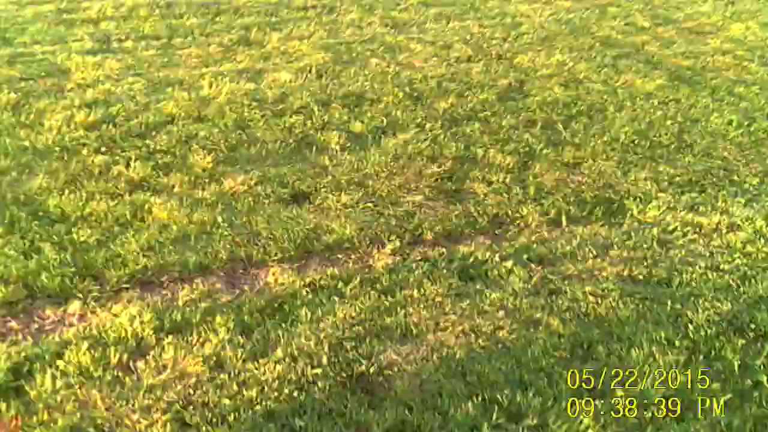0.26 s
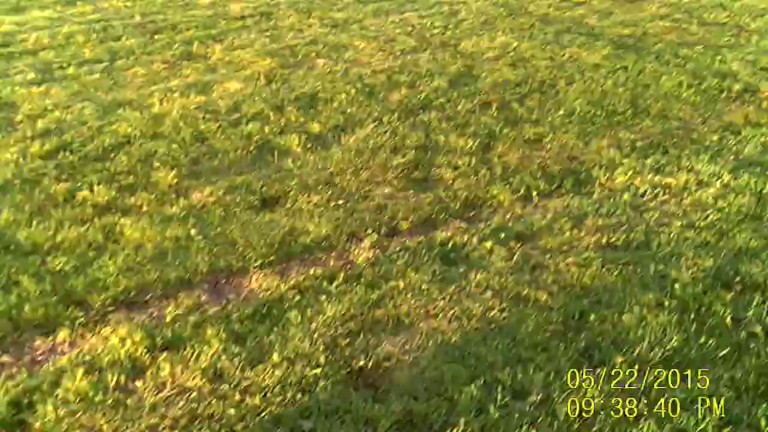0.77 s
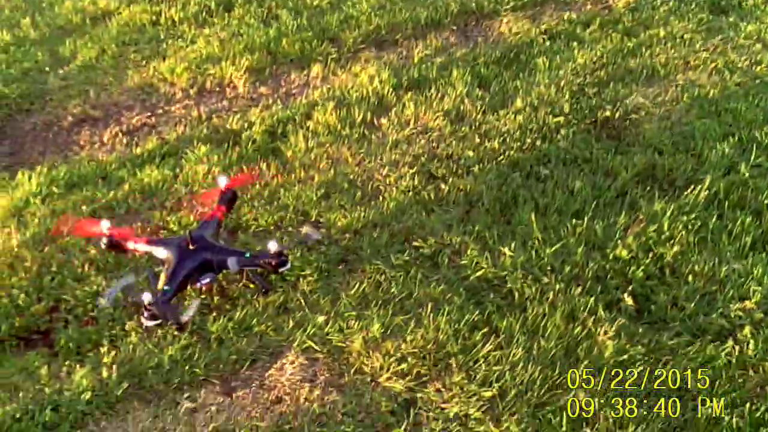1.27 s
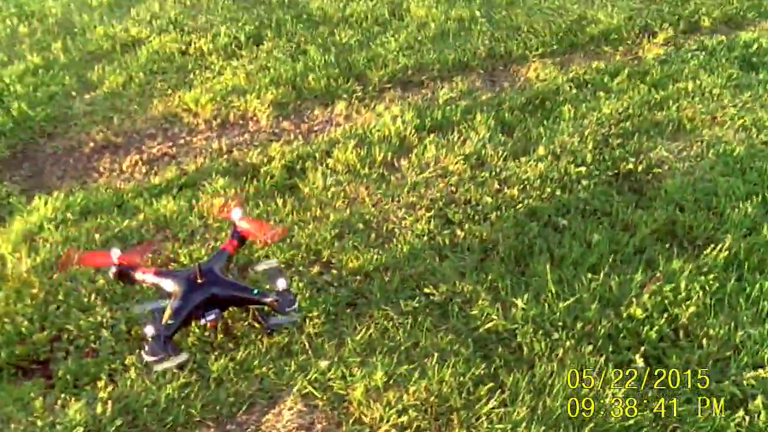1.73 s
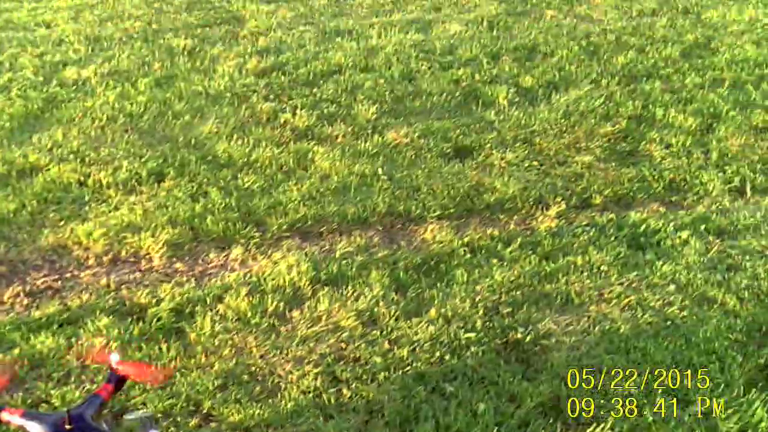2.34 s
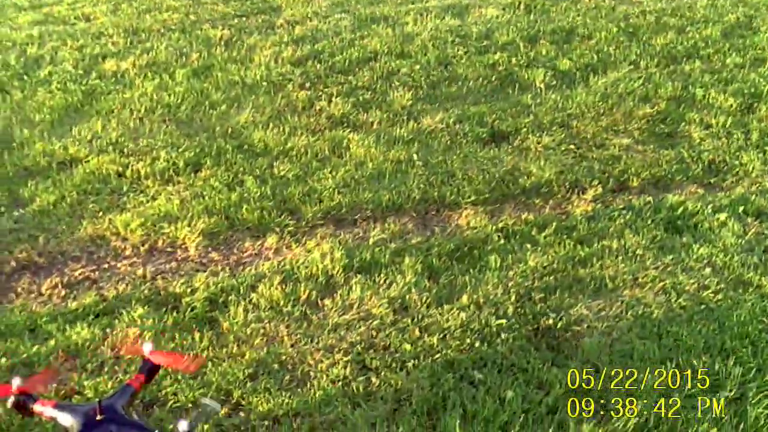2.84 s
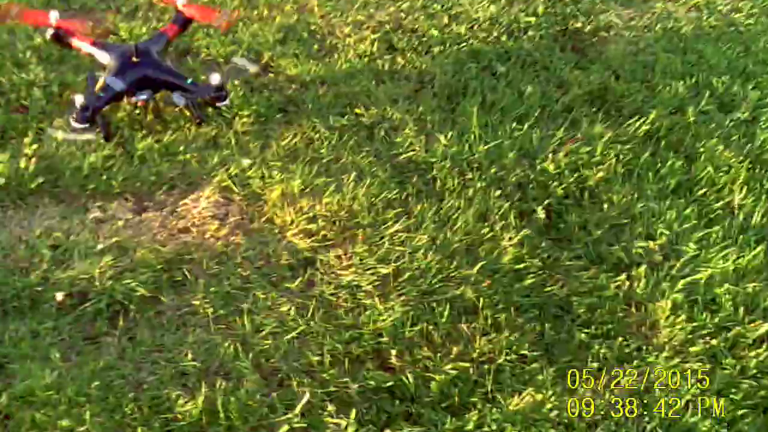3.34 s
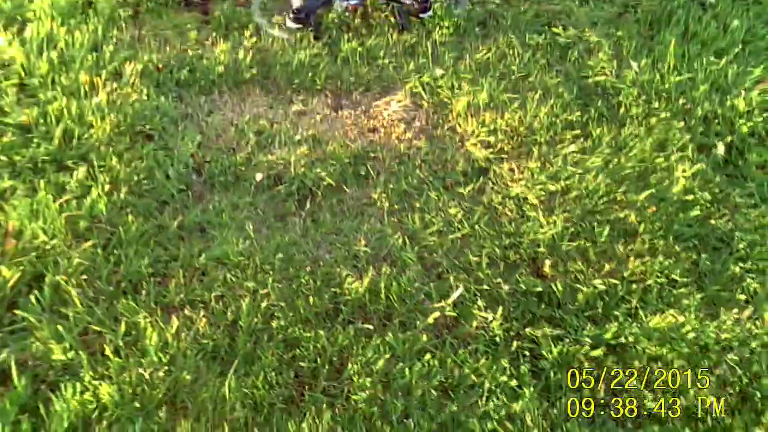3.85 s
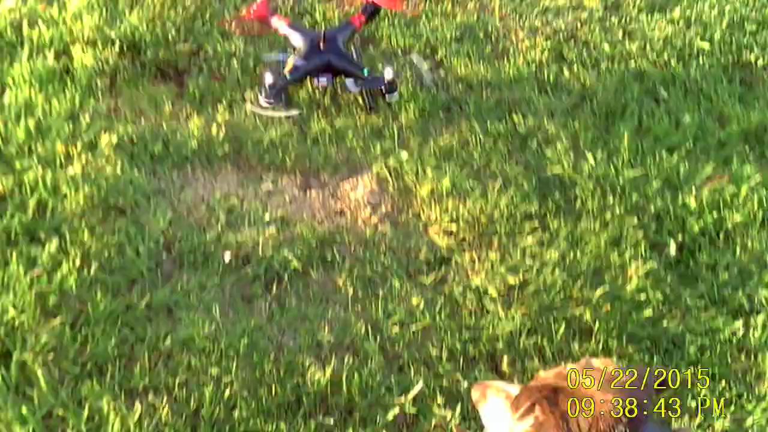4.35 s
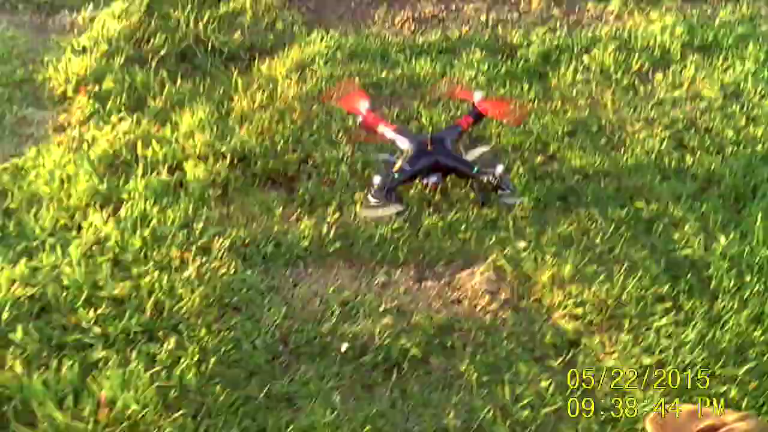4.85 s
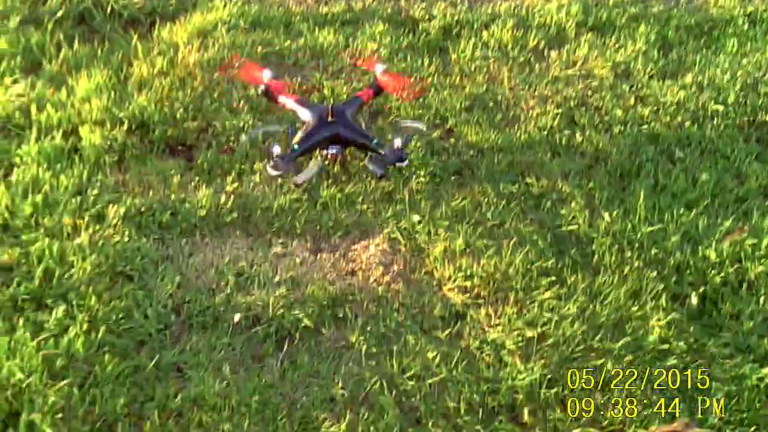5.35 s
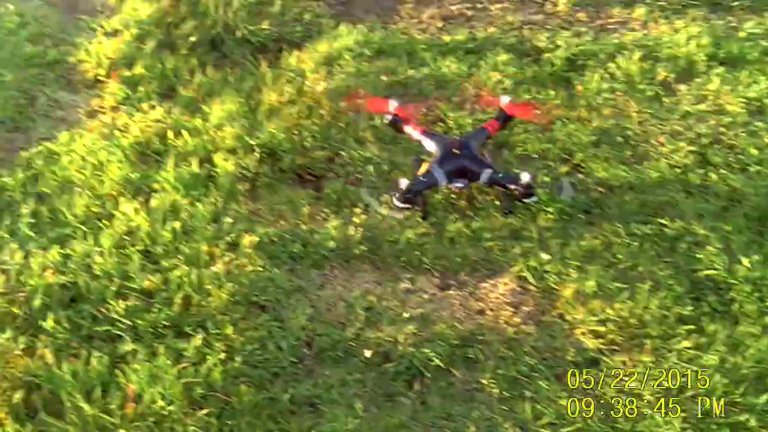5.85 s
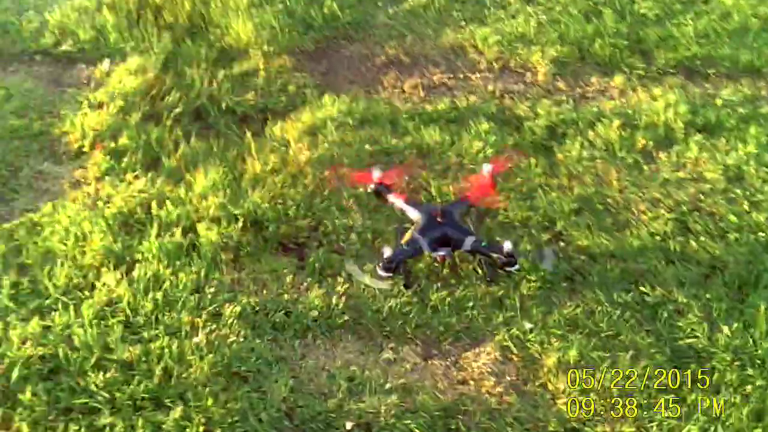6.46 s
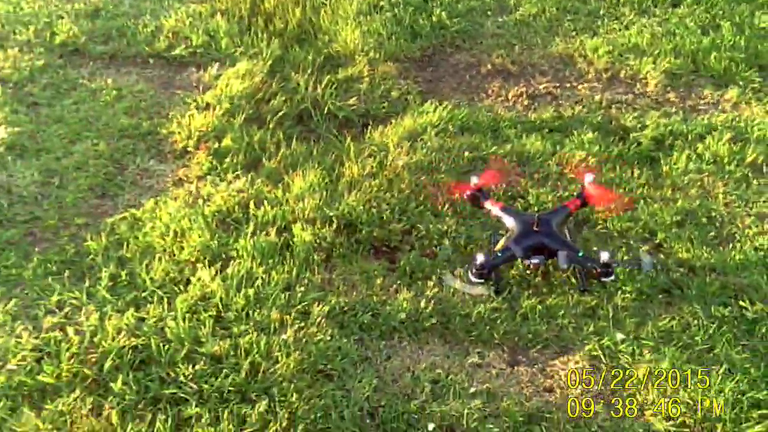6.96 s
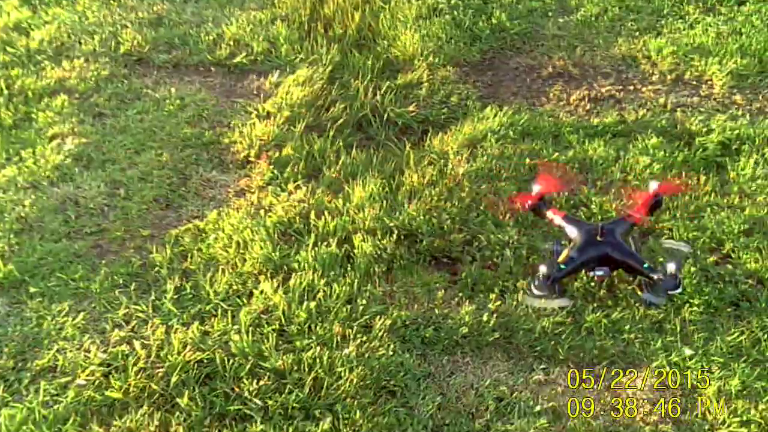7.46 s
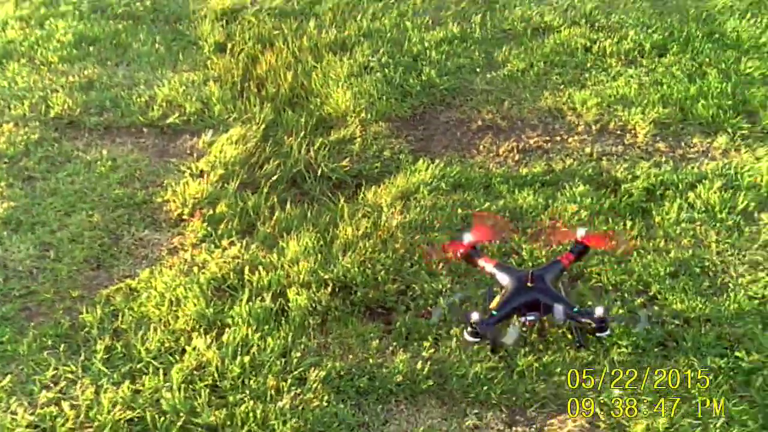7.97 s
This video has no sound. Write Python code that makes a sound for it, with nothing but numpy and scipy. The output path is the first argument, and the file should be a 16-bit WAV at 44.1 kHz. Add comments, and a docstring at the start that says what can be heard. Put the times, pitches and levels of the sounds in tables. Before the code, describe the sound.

Fingers shift on a thin plastic shell right against the microphone. Dry midrange clicks and short skin rubs come in loose groups over low hand rumble and quiet hiss. After a lull, hard knocks crackle and overload, then busy scraping with brief squeaks, another loud snap, scattered ticks and a closing scrape. Dry outdoor close-up, dull highs, no echo.

```python
"""Ticks and snaps of a plastic case come first, over a creeping grip and the low sway of the hand.
A small hand-held camera is held outdoors: jolts and tiny skin slips excite the decaying modes of its case.
Fingers scrape and squeak along it as bunched jerks and gliding tones; low thumps are bell-shaped pulses.
Shaped noise makes the thin hiss under it all, and the loudest snaps overload the recorder."""
import sys
import numpy as np
from scipy import signal
from scipy.fft import rfft, irfft
from scipy.io import wavfile
from scipy.ndimage import uniform_filter1d

SR = 44100
rng = np.random.default_rng(int(sys.argv[2]) if len(sys.argv) > 2 else 0)


def unload_audio(sound):
    """Save the sound as a 16-bit wav file, at the path given as the first command line argument."""
    columns = np.transpose(np.atleast_2d(sound))
    # keep every value between -1 and 1, then stretch to whole-number steps
    steps = np.round(np.clip(columns, -1, 1) * 32767)
    wavfile.write(sys.argv[1], SR, steps.astype(np.int16))


N = 361617
T = np.arange(N) / SR

# Colour of the hiss, before its overall level is set: (frequency [Hz], relative density [dB])
HISS_COLOUR = [(35, -38), (60, -2.5), (537, -15), (947, -14), (2220, -20.5), (2680, -17), (3490, -23),
               (5000, -21.5), (5490, -29.5), (7140, -54), (12100, -120)]
# The resting hand, glided between points: (time [s], creep of the grip in the shell [dB RMS], sway [dB RMS])
GRIP_LEVELS = [(0.0, -41, -27), (0.27, -71.5, -53), (0.62, -74, -49), (0.84, -45.5, -44), (1.3, -62.5, -53),
               (1.6, -43.5, -51), (1.74, -57.5, -50.5), (2.24, -58.5, -49), (2.56, -65.5, -52),
               (3.08, -53, -42.5), (3.299, -57.5, -44.5), (4.159, -71.5, -50.5), (4.27, -52, -46),
               (4.59, -52.5, -34), (4.82, -57.5, -39), (5.75, -54.5, -41), (6.37, -50, -37),
               (6.48, -63, -49), (6.9, -57.5, -41.5), (7.35, -54, -52.5), (7.86, -68, -43.5),
               (8.2, -46, -34)]
# Resonances of the case: (frequency [Hz], level against the others of its part [dB], free t60 [s])
CASE_MODES = [(182, -2, 0.033), (404, -6.5, 0.026), (473, 5.5, 0.0089), (700, -46, 0.054), (940, 7, 0.051),
              (1090, 19.5, 0.015), (1415, 11, 0.026), (1530, 3.5, .02), (2185, 12, 0.019),
              (2650, 13, 0.021), (2781, 15, 0.017), (3000, -17.5, 0.011), (4203, 2, 0.0096),
              (4434, -1.5, 0.013), (4800, -19.5, 0.042)]
# Upper edges of body, shell and lid; the microphone port rings above the last: (body, shell, lid [Hz])
PART_TOPS_HZ = (700, 1800, 3500)
# Low thumps, from short thuds under the hard knocks to slower pushes of the palm:
# (centre time [s], level before a fixed trim [dB], width setting [ms], direction [+1 or -1])
LOW_THUMPS = [(0.685, -28, 1.2, 1), (0.699, -34, 3.8, 1), (0.755, -18, 0.63, 1), (3.081, -27, 4, 1),
              (3.672, -12, 0.53, 1), (4.277, -29.5, 1.6, -1), (4.589, -13.5, 2.6, -1), (4.601, -27, 5.4, 1),
              (4.638, -29, 1.5, -1), (5.159, -8, 0.45, 1), (5.176, -33, 3.1, -1), (5.189, -28, 4.2, 1),
              (5.206, -26, 7.3, -1), (5.797, -23.5, 0.92, 1), (6.043, -32, 3.5, -1), (6.127, -25, 11, -1),
              (6.193, -20, 1.1, -1), (6.297, -30, 2.2, -1), (6.314, -32, 2.4, -1), (6.366, -18.5, 1.83, -1),
              (6.694, -30, 2.4, 1), (6.823, -30, 0.87, 1), (6.917, -29.5, 1.3, 1), (7.607, -33, 6, 1),
              (7.919, -29.5, 0.84, -1), (7.998, -14, 2.73, -1), (8.19, -27, 3.4, 1)]
# Skin scraping along the case, levels before each part's trim:
# (time [s], length [ms], shell [dB], body against shell [dB], port against shell [dB])
SKIN_SCRAPES = [(0.108, 26, -39.5, -32, -26), (0.586, 136, -43, 1, -27.5), (0.713, 42, -42.5, 1, -18),
                (0.761, 37, -41, 8.5, -22), (0.87, 94, -38, -5.5, -31), (0.908, 85, -36.5, -23, -27),
                (1.052, 38, -44, -4, -23), (1.23, 98, -46.5, -7, -26), (1.421, 50, -50, -2, -21),
                (1.541, 81, -39, -6, -23), (1.62, 133, -40, -12.5, -23), (1.94, 46, -43.5, -10, -28),
                (2.247, 31, -47.5, -3.5, -27), (2.327, 28, -46, -12, -20), (3.004, 104, -55, -3, -21),
                (3.2, 84, -58.5, -6, -23), (3.556, 56, -46, -7, -32), (4.228, 63, -49, -8, -47),
                (4.289, 120, -52, 0, -20), (4.513, 71, -48.5, 5.5, -24), (4.6, 40, -42, -15, -22),
                (4.766, 40, -39, -6, -33), (4.81, 106, -49, -12, -30), (5.176, 95, -50, 1, -39),
                (5.347, 170, -44, -11.5, -25), (5.676, 22, -48, -2.5, -12), (5.809, 28, -34.5, -4.5, -14.5),
                (5.838, 56, -39.5, -16, -24), (5.885, 15, -42, -1.5, -8.5), (5.903, 21, -38.5, -19, -27),
                (5.926, 52, -44, -9, -7.5), (5.991, 49.5, -35, -4.5, -27), (6.041, 37, -41.5, -4.5, -25),
                (6.131, 40, -36.5, 5.5, -26), (6.159, 49.5, -34, -4.5, -17), (6.209, 21, -41.5, 1, -18),
                (6.291, 68, -41, 2, -7.5), (6.369, 60, -38, -5, -10.5), (6.467, 83, -43.5, -17, -20),
                (6.677, 67, -47.5, 5, -23), (6.772, 16, -41, -21.5, -20), (6.789, 18, -41, 9.5, -23),
                (6.812, 23.6, -37.5, -5, -21), (6.918, 70, -51, -1, -18.5), (7.074, 40, -43.5, -0.5, -31),
                (7.574, 41, -45, 5, -21.5), (7.904, 51, -51.5, 8.5, -33), (7.988, 28, -42, -4, -3.5),
                (8.036, 83, -44.5, -14, -5.5), (8.115, 43, -29, -17, -9.5), (8.162, 20, -41, 3.5, -5.5)]
# A dry fingertip squeaking on the lid: (time [s], length [ms], start pitch [Hz], end pitch [Hz], level [dB RMS])
FINGER_SQUEAKS = [(5.885, 18.6, 2760, 2270, -37.5), (5.927, 67, 2710, 2500, -37),
                  (6.162, 44, 2420, 2650, -33.5)]
# Snaps and ticks: (time [s], shell peak [dB], favoured shell pitch [Hz], lid peak against shell [dB], slip [ms])
CASE_SNAPS = [(0.0281, -27.5, 940, 1.5, 0.33), (0.1092, -38, 910, -9, 1.4), (0.584, -21.5, 940, -35, 0.91),
              (0.6445, -32.5, 1100, -11.5, 1.8), (0.7421, -27, 1140, -8.5, 0.98),
              (0.7528, -20.5, 1090, -15, 0.65), (0.828, -27, 1120, -21, 0.75),
              (0.8635, -25.5, 1010, -21, 2), (0.89, -26.5, 930, -19, 1.64), (0.9164, -27.5, 875, -5, 0.5),
              (1.0592, -40, 980, -6, 1.75), (1.2326, -33.5, 970, -17, 1.8), (1.4324, -39, 960, 5, 0.6),
              (1.5432, -34, 1110, 0.5, 0.84), (1.596, -29.5, 1010, -5, 2.5), (1.603, -10, 963, -11.5, 2.07),
              (1.634, -30.5, 990, -2, 0.69), (1.703, -36, 940, -2.5, 5.2), (1.7212, -27.5, 990, -11, 1.4),
              (1.9607, -40, 1140, 0, 1.7), (2.0308, -34.5, 1090, -17, 1.2),
              (2.056, -30.5, 1060, -9.5, 0.89), (2.2678, -31, 890, -9.5, 2.64),
              (2.3433, -38, 1370, -0.5, 0.46), (2.3869, -30.5, 930, -7.5, 0.93),
              (2.424, -35.5, 1140, -11, 0.87), (2.8987, -30, 1010, -18, 3.7),
              (3.0144, -35.5, 1090, -9, 2.3), (3.0992, -36, 1090, -9, 0.24),
              (3.3444, -36.5, 1150, -13, 0.73), (3.5606, -34, 940, -15, 3.04),
              (3.671, -0.5, 956, -14.5, 0.74), (3.8395, -41, 1080, -21, 0.98), (3.8763, -36, 950, -14, 1.5),
              (4.2764, -12, 1160, -2, 0.16), (4.336, -23, 1165, -14, 0.62), (4.4689, -25, 960, -13, 1.15),
              (4.5074, -24, 960, -12.5, 2.1), (4.527, -36.5, 1000, 0.5, 0.8),
              (4.547, -17, 1090, -21.5, 0.45), (4.569, -13, 940, -4.5, 0.46),
              (4.5784, 15.5, 1110, -21, 1.07), (4.5879, -6.5, 1005, -6.5, 1.08),
              (4.6348, -21.5, 970, -14, 1.08), (4.6404, -20.5, 1020, -4, 1.2),
              (4.7701, -15.5, 1000, -18.5, 0.874), (5.0472, -17.5, 1040, -13.5, 1.1),
              (5.0852, -46, 970, 1, 0.5), (5.1574, -4, 876, -8, 0.93), (5.1588, -2, 1080, -19.5, 2.9),
              (5.1645, -9.5, 1035, -21.5, 1.06), (5.197, -13.5, 1065, -14, 2.4),
              (5.235, -21.5, 1050, -12.5, 0.85), (5.4697, -27.5, 1000, -20, 0.94),
              (5.613, -35, 980, -5.5, 0.77), (5.8587, -31, 1090, -16, 2.34), (5.9879, -20, 960, -12.5, 1.1),
              (6.0038, -26.5, 1040, -9, 0.85), (6.034, -28.5, 1030, -20, 1.74),
              (6.1655, -17, 885, -4.5, 0.47), (6.1885, -16, 974, -15, 1.1), (6.2957, -30, 950, -8, 0.88),
              (6.3172, -27, 1300, 0, 0.23), (6.339, -15.5, 980, -0.5, 0.67), (6.469, -27, 1000, 1.5, 0.86),
              (6.5125, -30, 1020, -13, 0.67), (6.6773, -35, 930, -23, 1.43),
              (6.7104, -1, 1104, -14.5, 1.58), (6.825, -27, 920, -9.5, 1.38),
              (6.9129, -23.5, 1055, -11.5, 1.42), (7.0338, -23.5, 1070, -13.5, 1.08),
              (7.2273, -15.5, 1090, -5, 1.16), (7.5766, -32, 940, -12.5, 3.2), (7.826, -29, 1045, -1, 0.39)]

BODY, SHELL, LID, PORT = range(4)
HISS_DB = -61.5  # RMS
SWAY_TOP_HZ = 14.1
# Creep: its lid against the shell; the palm's rumble lies between creep and sway
CREEP_LID_DB, PALM_DB, PALM_SWAY_SHARE = -10, -3, 0.37
# A scrape's lid brightens with the port, less steeply: dB against the shell, and dB per port dB
SCRAPE_LID_DB, LID_PER_PORT_DB = 3.5, 0.58
# A middling snap gives the body this much; harder ones stay more in the shell; the port follows the lid
SNAP_MID_DB, SNAP_BODY_DB, BODY_LOSS_PER_DB, SNAP_PORT_BELOW_LID_DB = -28, -13, 0.26, 11.5
# Share of the free ring left after a 1 ms slip; slower slips ring longer by this power
RING_SHARE, RING_POWER = 0.52, 0.43
PREAMP_CLIP, LATE_CLIP = 0.72, 0.69  # share of full scale
MIC_TOP_HZ, TOP_HZ, DC_OFFSET = 5550, 16100, 0.0044


def undb(db):
    """Turn decibels into an amplitude factor."""
    return 10 ** (np.asarray(db) / 20)


def level(x, db):
    """Set a sound's RMS level in dB."""
    return x * undb(db) / np.sqrt(np.mean(x ** 2))


def add(track, s, sound):
    """Mix a short sound in at time s."""
    i = int(s * SR)
    track[i:i + len(sound)] += sound[:N - i]


def lowpass(x, order, hz):
    """Dull a sound above hz with a smooth filter."""
    return signal.sosfilt(signal.butter(order, hz, fs=SR, output="sos"), x)


def walk(rate_hz):
    """Random levels held 1 / rate_hz seconds, then slewed into ramps; spread near 1."""
    k = int(SR / rate_hz)
    held = np.repeat(rng.standard_normal(N // k + 1), k)
    return 1.14 * uniform_filter1d(held, k)[:N]


def hiss():
    """Amplifier hiss and far outdoor noise, dulled by the case: white noise coloured in its spectrum."""
    hz, db = np.transpose(HISS_COLOUR)
    f = np.arange(N // 2 + 1) * SR / N + 1  # 1 Hz up, so the logarithm exists
    colour = undb(np.interp(np.log(f), np.log(hz), db))
    return level(irfft(rfft(rng.standard_normal(N)) * colour, N), HISS_DB)


def sway():
    """The hand's slow movement pumps the sealed air behind the microphone: very low noise."""
    s, _, sway_db = np.transpose(GRIP_LEVELS)
    slow = lowpass(rng.standard_normal(N), 2, SWAY_TOP_HZ)
    return level(slow, 0) * undb(np.interp(T, s, sway_db))


def case_modes(hold=1.0):
    """One decaying sine per mode, building up over a cycle or two; hold scales its ring time."""
    hz, db, t60 = np.transpose(CASE_MODES)[:, :, None]
    t = T[:int(0.05 * SR)]
    free = np.exp(-np.log(1000) * t / np.maximum(t60, 0.003))
    # the touched wall follows hold, the far side rings weakly at its free rate
    decay = free ** (1 / np.clip(hold, 0.15, 2)) + 0.089 * free
    build_up = 1 - np.exp(-(t * hz / 1.1) ** 2)
    rings = undb(db) * np.sin(2 * np.pi * hz * t) * decay * build_up
    return hz[:, 0], rings, np.searchsorted(PART_TOPS_HZ, hz[:, 0])


def favoured(hz, part, near_hz, reach_oct, least=0.069):
    """Shell modes near the touched spot's pitch ring most, the others keep a small share."""
    nearness = np.exp(-0.5 * (np.log2(hz / near_hz) / reach_oct) ** 2)
    return np.where(part == SHELL, least + nearness, 1)


def slips(per_s):
    """Tiny uneven jerks of skin that sticks and lets go: random impulses of either sign."""
    happens = rng.random(N) < per_s / SR
    size = np.minimum(rng.exponential(size=N), 2.5)
    return happens * rng.choice([-1, 1], N) * size


def palm(gain):
    """The palm's drag, felt as a dull rumble: low noise of wandering strength."""
    band = signal.butter(1, (35, 170), "bandpass", fs=SR, output="sos")
    drag = lowpass(signal.sosfilt(band, rng.standard_normal(N)), 2, 260)
    return gain * level(drag * undb(3.3 * walk(25)), -2.5)


def creep(near_hz=1000, reach_oct=0.35, catch_db=4.0, catch_hz=90, swell_db=5.0, swell_hz=14):
    """A light grip damps little: small slips ring shell and lid in short blobs that swell and fade."""
    s, shell_db, sway_db = np.transpose(GRIP_LEVELS)
    hz, rings, part = case_modes(hold=2)
    favour = favoured(hz, part, near_hz, reach_oct)
    jerks = slips(per_s=1200) * undb(catch_db * walk(catch_hz) + swell_db * walk(swell_hz))
    palm_db = PALM_DB + shell_db + PALM_SWAY_SHARE * (sway_db - shell_db)
    out = palm(undb(np.interp(T, s, palm_db)))
    for k, db in ((SHELL, shell_db), (LID, shell_db + CREEP_LID_DB)):
        ring = signal.oaconvolve(jerks, favour[part == k] @ rings[part == k])[:N]
        out += undb(np.interp(T, s, db)) * level(ring, 0)
    return out


def thumps(leak_hz=25):
    """Each thump pushes the diaphragm as a bell-shaped pulse; the vent leaks, so it swings back past rest."""
    out = np.zeros(N)
    for s, db, ms, way in LOW_THUMPS:
        width = ms / 1000
        t = T[:int(6 * ms * SR / 1000)] - 3 * width
        push = np.exp(-0.5 * (t / (0.6 * width)) ** 2)
        add(out, s + t[0], np.sign(way) * undb(db + 1.0) * push)
    return signal.sosfilt(signal.butter(2, leak_hz, "highpass", fs=SR, output="sos"), out)


def scrapes(edge_ms=10.0, catch_db=3.0, catch_hz=80):
    """Sliding skin jerks in dense bunches and rings every part of the case, over the palm's rumble."""
    gain = np.zeros((4, N))
    for s, ms, db, body_db, port_db in SKIN_SCRAPES:
        lid_db = SCRAPE_LID_DB + LID_PER_PORT_DB * port_db
        parts_db = db + np.array([[body_db], [0], [lid_db], [port_db]])
        gain[:, int(s * SR):int((s + ms / 1000) * SR)] += undb(parts_db)
    gain = uniform_filter1d(gain, int(edge_ms * SR / 1000), axis=1)
    _, rings, part = case_modes()
    jerks = slips(per_s=3000)
    bunches_db = catch_db * walk(catch_hz)  # shared by all parts
    out = palm(gain[BODY])
    for k, trim_db in enumerate((-6.0, -3.5, -4.5, 0.3)):
        ring = signal.oaconvolve(jerks, rings[part == k].sum(axis=0))[:N]
        out += gain[k] * level(ring * undb(bunches_db + 2.8 * walk(70)), trim_db)
    return out


def squeaks(width_hz=500):
    """Fast regular stick-slip: a gliding tone whose strength and phase stumble every few ms."""
    out = np.zeros(N)
    slow = signal.butter(2, width_hz / 2, fs=SR, output="sos")
    for s, ms, from_hz, to_hz, db in FINGER_SQUEAKS:
        n = int(ms * SR / 1000)
        stumble = signal.sosfiltfilt(slow, rng.standard_normal((2, 4096)))[:, :n]
        phase = 2 * np.pi * np.cumsum(np.linspace(from_hz, to_hz, n)) / SR
        tone = (stumble[0] + 1j * stumble[1]) * np.exp(1j * phase)
        add(out, s, level(tone.real * signal.windows.tukey(n, 0.4), db))
    return out


def snap_force(t, slip, rattle=0.51, rattle_ms=3.3):
    """The push of one snap: a rough slip swells and fades, a jolt strikes, loose edges rattle after it."""
    rough = rng.standard_normal(len(t))
    taps = rng.random(len(t)) < 600 / SR
    jolt = int(max(slip - 0.0007, 0) * SR)
    force = rough * (t / slip) * np.exp(1 - 2 * t / slip) / np.sqrt(slip * SR)
    force[jolt] += 1
    rattling = rough * taps * np.exp(-t * 1000 / rattle_ms)
    force[jolt:] += rattle * rattling[:len(t) - jolt]
    return force


def snaps(reach_oct=0.14, scatter_db=4):
    """A seam lets go: its slip, jolt and rattle ring the case modes, unevenly from snap to snap."""
    out = np.zeros(N)
    t = T[:int(0.03 * SR)]
    for s, db, near_hz, lid_db, slip_ms in CASE_SNAPS:
        slip = max(slip_ms, 0.2) / 1000
        hz, rings, part = case_modes(RING_SHARE * (slip * 1000) ** RING_POWER)
        force = snap_force(t, slip)
        scatter = undb(scatter_db * rng.standard_normal(len(hz)))
        gains = favoured(hz, part, near_hz, reach_oct) * scatter
        body_db = SNAP_BODY_DB - BODY_LOSS_PER_DB * (db - SNAP_MID_DB)
        for k, part_db in enumerate((body_db, 0, lid_db, lid_db - SNAP_PORT_BELOW_LID_DB)):
            ring = signal.fftconvolve(force, gains[part == k] @ rings[part == k])
            add(out, s, ring * undb(db + part_db) / np.abs(ring).max())
    return out


def scene():
    """Sum the layers, from the hiss up to the snaps, into one channel."""
    return (hiss() + sway() + creep() + thumps() + scrapes() + squeaks() + snaps())[None]


def record(dry):
    """The preamplifier clips, the narrow microphone path rounds the flat tops, a later stage shaves overshoots."""
    narrow = signal.ellip(7, 0.3, 70, MIC_TOP_HZ, fs=SR, output="sos")
    mic = signal.sosfilt(narrow, np.clip(dry, -PREAMP_CLIP, PREAMP_CLIP)) + DC_OFFSET
    top = signal.ellip(8, 0.1, 70, TOP_HZ, fs=SR, output="sos")
    return signal.sosfilt(top, np.clip(mic, -LATE_CLIP, LATE_CLIP))


dry = scene()
out = record(dry)
unload_audio(out)
```